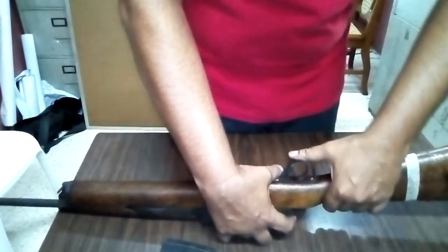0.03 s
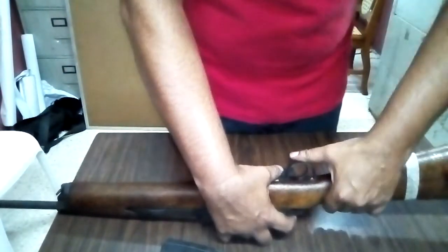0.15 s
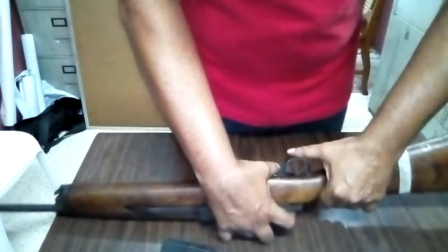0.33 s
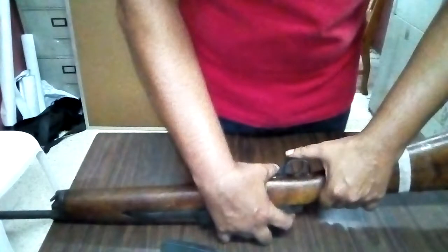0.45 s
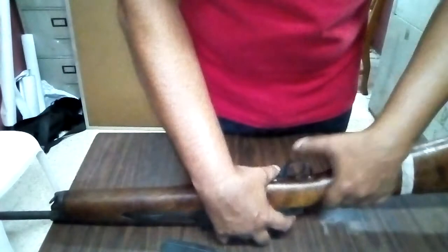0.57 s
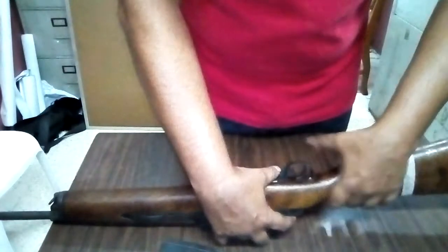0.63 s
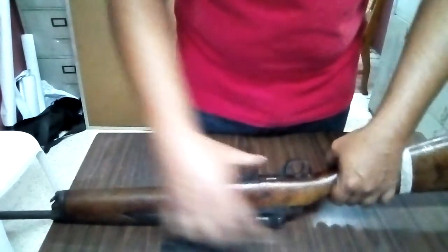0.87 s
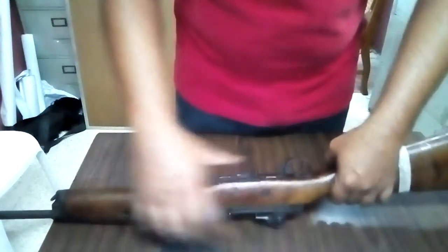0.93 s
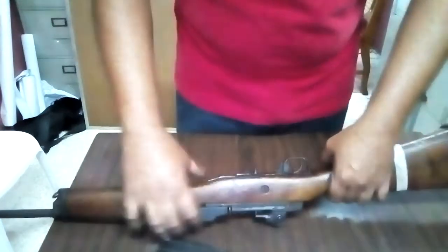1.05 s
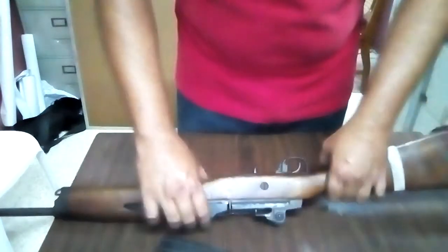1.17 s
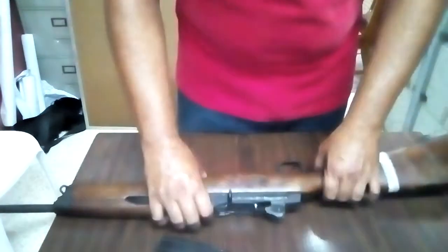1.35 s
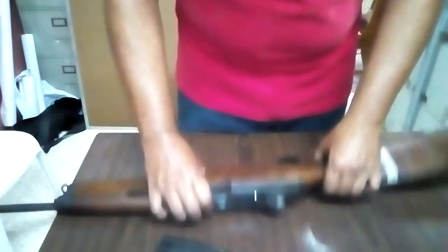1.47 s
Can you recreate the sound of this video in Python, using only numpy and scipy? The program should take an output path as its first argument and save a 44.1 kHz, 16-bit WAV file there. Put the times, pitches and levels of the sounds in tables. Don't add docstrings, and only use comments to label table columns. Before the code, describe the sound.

A rifle latch snaps shut with a bright steel crack and short ring, then the wooden stock clatters onto a table; later soft rubbing, low bumps and a tiny click, close in a small hard room.

```python
import sys
import numpy as np
from scipy import signal
from scipy.fft import rfft, irfft, next_fast_len
from scipy.io import wavfile
from scipy.ndimage import map_coordinates

SR = 44100
rng = np.random.default_rng(int(sys.argv[2]) if len(sys.argv) > 2 else 0)


def convert_level_to_amplitude(level_db):
    exponent = np.asarray(level_db, float) / 20
    return 10 ** exponent


def master(y):
    cut = np.clip(np.atleast_2d(y).T, -1, 1)
    pcm = np.round(cut * 32767)
    wavfile.write(sys.argv[1], SR, pcm.astype(np.int16))


N = 66150
RISE_S = 0.00061


def unit(x):
    return x / np.sqrt(np.mean(x ** 2) + 1e-20)


def along(points, hz):
    f, v = np.transpose(points)
    return np.interp(np.log(hz + 1), np.log(f + 1), v)


def filtered(x, response):
    m = next_fast_len(len(x) + SR // 2)
    spectrum = rfft(x, m) * response(np.fft.rfftfreq(m, 1 / SR))
    return irfft(spectrum, m)[:len(x)]


def coloured_noise(points):
    return unit(filtered(rng.standard_normal(N), lambda hz: convert_level_to_amplitude(along(points, hz))))


def causal(points):
    size = 2 ** 12
    cepstrum = irfft(np.log(convert_level_to_amplitude(along(points, np.fft.rfftfreq(size, 1 / SR)))), size)
    folded = np.r_[cepstrum[0], 2 * cepstrum[1:size // 2], np.zeros(size // 2)]
    h = irfft(np.exp(rfft(folded)), size)
    return h / np.linalg.norm(h)


def wobble(knots_per_s):
    return map_coordinates(rng.standard_normal(128), [np.arange(N) * knots_per_s / SR])


def add(out, s, x):
    part = out[round(s * SR):][:len(x)]
    part += x[:len(part)]


def echo():
    # f/Hz, t60/s
    decay = [(100, 0.38), (400, 0.41), (1000, 0.51), (3000, 0.45), (6500, 0.43), (10000, 0.348),
             (15000, 0.25)]
    build_s, first_wall_s = 0.0094, 0.004
    hz, t, z = signal.stft(rng.standard_normal(SR), SR, nperseg=256)
    dying = convert_level_to_amplitude(-60 * t / along(decay, hz)[:, None])
    tail = signal.istft(z * dying, SR, nperseg=256)[1]
    tail = tail * (1 - np.exp(-np.arange(len(tail)) / SR / build_s))
    return np.pad(tail / np.linalg.norm(tail), (round(first_wall_s * SR), 0))


def room(x, wet_db):
    return x + convert_level_to_amplitude(wet_db) * signal.fftconvolve(x, echo())[:N]


def cracks(contacts, colour, t60_s, wet_db):
    out, t = np.zeros(N), np.arange(SR // 10) / SR
    for s, db in contacts:
        burst = convert_level_to_amplitude(wet_db) * echo()
        envelope = convert_level_to_amplitude(-60 * t / t60_s) * (1 - np.exp(-t / RISE_S))
        burst[:len(t)] += 2 * rng.standard_normal(len(t)) * envelope
        add(out, s, convert_level_to_amplitude(db) * signal.fftconvolve(burst, causal(colour)))
    return out


def rings(contacts, modes):
    out, t = np.zeros(N), np.arange(SR // 10) / SR
    for s, db in contacts:
        ring = 0
        for hz, level_db, t60_s in modes:
            decay = convert_level_to_amplitude(level_db + rng.normal(0, 1) - 60 * t / t60_s)
            ring = ring + decay * np.sin(2 * np.pi * hz * t)
        add(out, s, convert_level_to_amplitude(db) * ring * (1 - np.exp(-t / RISE_S)))
    return out


def floor():
    # f/Hz, density/dB per Hz
    tone_colour = [(22, -22), (40, -8.5), (110, -7), (260, -4.5), (900, -6), (2000, -17.5), (6800, -23),
                   (8300, -35), (16000, -40)]
    # f/Hz, density/dB per Hz
    hiss_colour = [(6000, -32), (9000, -21), (13500, -2.5), (15000, 9.5), (15700, 3.5)]
    # f/Hz, level/dB
    harmonics = [(59, -82.5), (118.5, -67.5), (178, -74), (237, -66)]
    tone_db, hiss_db = -58, -73
    t = np.arange(N) / SR
    hum = 0
    for hz, db in harmonics:
        level = convert_level_to_amplitude(db + 1.5 + 0.81 * wobble(6.6))
        hum = hum + level * np.sin(2 * np.pi * hz * t + 0.5 * wobble(5))
    tone = convert_level_to_amplitude(tone_db + 1.2 * wobble(5.1)) * coloured_noise(tone_colour)
    return tone + convert_level_to_amplitude(hiss_db) * coloured_noise(hiss_colour) + hum


def slide():
    # t/s, level/dB
    stroke = [
        (1.044, -83),
        (1.048, -57),
        (1.07, -63.5),
        (1.111, -58),
        (1.135, -68),
        (1.2, -90),
    ]
    # f/Hz, level/dB
    skin = [(300, -8.5), (1500, -5.5), (3500, -27.5), (5000, -12), (6500, -11), (8000, -36.5)]
    s, db = np.transpose(stroke)
    level_db = np.interp(np.arange(N) / SR, s, db) + 1.4 * wobble(58.5)
    return room(coloured_noise(skin) * convert_level_to_amplitude(level_db), wet_db=-4.5)


def table(contacts, modes, wet_db):
    # f/Hz, level/dB
    loose = [(60, -43.5), (200, 2), (700, 2), (2000, -10.5), (4500, -24), (6500, -19.5), (8300, -42),
             (15000, -53)]
    top_db, dull_db_per_ms = 12.5, -6
    push, clatter = np.zeros(N), 0
    for s, db, ms in contacts:
        add(push, s, -convert_level_to_amplitude(db) * np.hanning(round(ms * SR / 1000) + 2) / ms)
        dull_db = dull_db_per_ms * (ms - 1)
        colour = [(hz, level + dull_db * max(0, np.log2(hz / 1000))) for hz, level in loose]
        loose_db = -35 + 0.92 * (db + 25.5) - 4.5 * ms
        clatter = clatter + cracks([(s, loose_db)], colour, t60_s=0.056, wet_db=26)

    def wood(f):
        total = 0
        for k, (centre, width, db) in enumerate(modes):
            damping = 1j * f * width
            resonance = damping / (centre * centre - f * f + damping)
            total = total + (-1) ** (k // 2) * convert_level_to_amplitude(db + top_db) * resonance
        return total

    return room(filtered(push, wood), wet_db) + clatter


def knocks():
    # t/s, level/dB, contact/ms
    contacts = [(.4718, -21.5, 1.06), (.480, -26.5, 0.88), (.4868, -21, 1.13), (.497, -23, 1.56),
                (.512, -25.5, 2.47), (.530, -23, 4.4), (.552, -58, 0.79), (.600, -58, 1.6),
                (1.034, -44.5, 2.35), (1.045, -43.5, 3.1), (1.062, -46.5, 1.8), (1.092, -44, 1.2),
                (1.279, -37, 1.9), (1.294, -37.5, 1.58), (1.323, -32, 3.2), (1.355, -36.5, 2),
                (1.363, -36, 1.2), (1.376, -51, 0.86), (1.389, -35, 2.5), (1.399, -26, 3.85),
                (1.416, -39, 3.5), (1.434, -48, 2.5), (1.472, -73, 0.4)]
    # f/Hz, width/Hz, level/dB
    free_modes = [(63, 48, -11.5), (122.4, 13.5, -1.5), (181.5, 13.6, 1.5), (237, 77, -12),
                  (291.7, 10, 4.5), (371, 19.6, -4), (583, 28, -6), (764, 120, -12.5), (1050, 190, -5)]
    # f/Hz, width/Hz, level/dB
    held_modes = [(115.4, 23, -5), (171.7, 19.4, 1.5), (237, 22, -11), (288.3, 19, 0.5), (368.5, 28, 4),
                  (600, 43, -12), (950, 220, -6)]
    return table(contacts[:8], free_modes, wet_db=-2) + table(contacts[8:], held_modes, wet_db=-7)


def click():
    # t/s, level/dB
    contacts = [
        (1.4735, -46.5),
        (1.4775, -52),
        (1.481, -47),
        (1.4885, -45),
        (1.496, -50),
    ]
    # f/Hz, level/dB
    tick = [(200, -19), (1000, 2), (2200, -6), (4500, -15.5), (6600, -13), (8300, -27), (15000, -67)]
    # f/Hz, level/dB, t60/s
    pawl = [(934, 9, 0.013), (2130, -5, 0.0172), (6770, -1, 0.011)]
    return cracks(contacts, tick, t60_s=0.024, wet_db=19) + rings(contacts, pawl)


def long_ring(s, db):
    # f/Hz, level/dB, t60/s
    modes = [(106.6, -7, 0.2), (225.6, -9.5, 0.37), (487, -2, 0.35), (682, -5.5, .3), (741.4, 13.5, 0.12),
             (820, -2, 0.22), (855, -2.5, 0.25), (993, -2.5, 0.38), (1142, 0.5, 0.43), (1668, -2.5, 0.32),
             (1813, -3.5, 0.43), (6200, 1.5, 0.17), (6650, -3, 0.19), (6520, -6.5, 0.56)]
    ring_db, rise_cycles = -8, 1.8
    out, t = np.zeros(N), np.arange(SR // 2) / SR
    ring = 0
    for hz, level_db, t60_s in modes:
        decay = convert_level_to_amplitude(level_db - 60 * t / t60_s + 3.23 * wobble(44)[:len(t)])
        rise = (1 - np.exp(-t * hz / rise_cycles)) ** 2
        ring = ring + decay * rise * np.sin(2 * np.pi * hz * t + 0.57 * wobble(26.7)[:len(t)])
    add(out, s, convert_level_to_amplitude(db + ring_db) * ring)
    return out


def snap():
    # t/s, level/dB
    blows = [
        (.2306, -19),
        (.2327, -19),
        (0.2384, -21.5),
        (0.2421, -26),
    ]
    # f/Hz, level/dB
    crack = [(70, -46.5), (300, -13), (800, -2.5), (1700, -8), (3000, -11), (4500, -13), (6400, -5),
             (8300, -25), (12500, -37.5), (15000, -31)]
    # f/Hz, level/dB, t60/s
    latch = [(231, -12.5, 0.14), (505, -15, .05), (753, 3.5, 0.045), (1240, -4, 0.026),
             (2060, -15.5, 0.012), (4760, -2, 0.015), (6064, 5.5, 0.015), (7060, -6, 0.0089)]
    return cracks(blows, crack, t60_s=0.019, wet_db=25) + rings(blows, latch) + long_ring(*blows[0])


def scene():
    return (floor() + slide() + knocks() + click() + snap())[None]


def low_pass(x):
    return signal.sosfilt(signal.butter(12, 16640, fs=SR, output="sos"), x)


def record(dry):
    low_cut_hz, top_hz = 16.7, 15750
    mix = filtered(dry[0], lambda hz: (hz < top_hz) * hz / (hz + low_cut_hz))[None]
    return low_pass(mix)


dry = scene()
out = record(dry)
master(out)
```